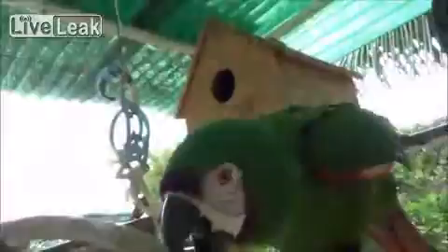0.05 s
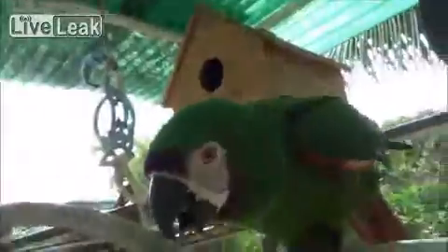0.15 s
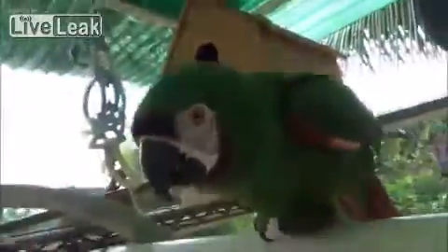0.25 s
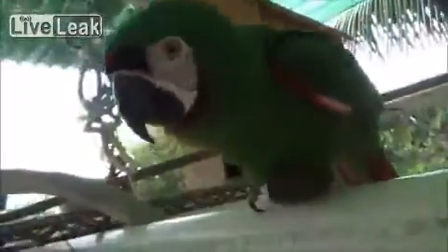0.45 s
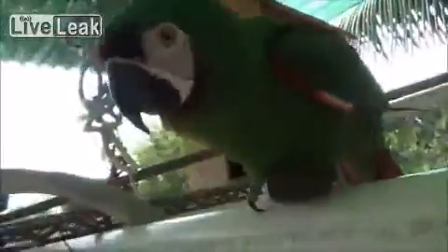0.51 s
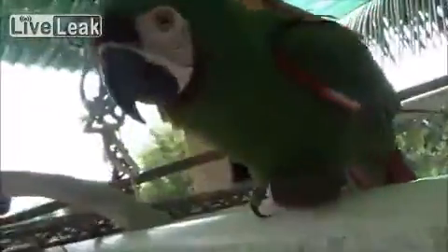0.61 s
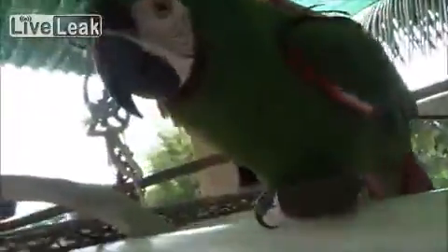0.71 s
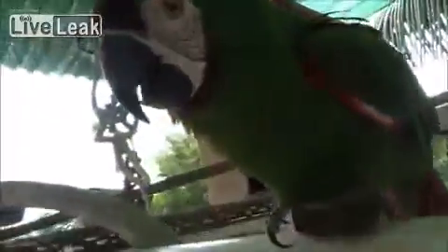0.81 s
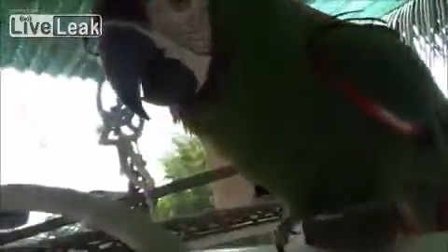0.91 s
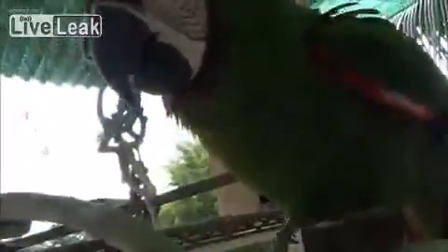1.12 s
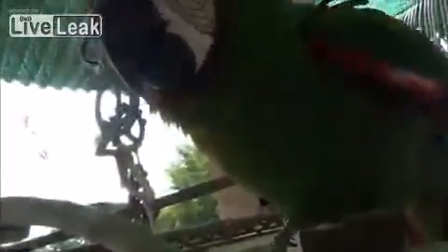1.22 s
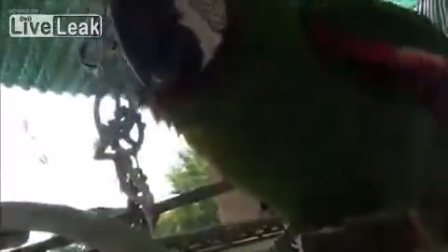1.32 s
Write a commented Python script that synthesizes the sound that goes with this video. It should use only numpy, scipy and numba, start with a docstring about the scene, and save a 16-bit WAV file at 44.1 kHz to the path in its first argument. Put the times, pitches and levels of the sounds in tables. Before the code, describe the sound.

A large parrot gives one harsh, raspy call close by, trailing into dry clicks.

```python
"""A macaw calls once, close by, under a light porch roof.
Quiet outdoor hiss, rumble and a thin whine run throughout. The bird shifts with a soft rustle.
Its voice box snaps unevenly in a harsh rasp with a squeak, then locks into a wavering nasal note.
The note breaks into a creak, which slows to dry clicks as the beak opens, with one more squeak.
A short echo follows each sound of the call. Last comes a faint, distant whistle."""
import sys
import numpy as np
from scipy import signal
from scipy.fft import rfft, irfft
from scipy.io import wavfile
from numba import njit

SR = 44100
rng = np.random.default_rng(int(sys.argv[2]) if len(sys.argv) > 2 else 0)


def to_wav(sig):
    """Store sig (one row per channel, or 1-D mono) as 16-bit WAV at the path in sys.argv[1].

    Samples outside -1..1 are clipped; the rate is SR.
    """
    pcm = np.clip(np.atleast_2d(sig), -1, 1) * 32767
    pcm = np.round(pcm).astype(np.int16)
    wavfile.write(sys.argv[1], SR, pcm.T)  # frames by channels


N = 59535
T = np.arange(N) / SR

# Tone of the outdoor hiss. Each row: frequency in Hz, level in dB.
HISS_COLOUR = [(18, -55), (30, -14), (59, -9), (92, -3), (122, -6), (222, -5.5), (296, -3), (374, -11.5),
               (567, -6.5), (1200, -12.5), (1730, -11), (2030, -13), (15000, -26)]
# Swell of the hiss. Each row: time in seconds, change of level in dB.
HISS_SWELL = [(0, 0), (.2, 0.5), (1.0, 0.5), (1.15, -1), (1.35, -2)]
# Loudness of the rustle. Each row: time in seconds, level in dB.
RUSTLE_LEVEL = [(.05, -67), (.07, -40), (.105, -43), (.15, -58), (.17, -81)]
# Tone of the rustle. Each row: frequency in Hz, level in dB.
RUSTLE_COLOUR = [(150, -37), (300, 11.5), (600, -3.5), (1100, 4), (2500, -2.5), (6000, -10.5), (14000, -15)]
# Course of the rasp. Each row: time in seconds, level in dB, treble boost in dB,
# level of every second snap against the others in dB.
RASP_SHAPE = [(.211, -22, -29, -23.5), (.219, -17, -29, -19), (.238, -19, -13, 4), (.248, -10, 0.5, -2),
              (.262, -14, 0, 5), (.29, -11, -1, -8), (.326, -11.5, 3.5, 6.5), (.352, -12.5, -2.5, 12),
              (.385, -40, 24.5, -4), (.42, -32, 4, 6)]
# Where the throat rings in the rasp. Each row: frequency in Hz, width in Hz, level in dB.
RASP_THROAT = [(474, 270, 0.5), (763, 218, 7.5), (1670, 580, -16), (2910, 460, -6), (3920, 400, -5.5),
               (6430, 520, -13.5), (7900, 330, -17), (9860, 640, -20.5), (12600, 2100, -25.5)]
# The windpipe's dip between resonances and its treble loss. Each row: frequency in Hz, level in dB.
WINDPIPE = [(4500, 1.5), (5200, -11), (6100, -10.5), (6800, 6.5), (10500, 10), (15000, -8)]
# The nasal ring, which rises as the beak opens. Each row: time in seconds, frequency in Hz.
NASAL_RING = [(.25, 1815), (.272, 2100), (.326, 2070), (.35, 2400), (.388, 2650), (.415, 2700),
              (.475, 2370), (.55, 2320), (.66, 2430)]
# Squeaks. Each row: start in seconds, length in seconds, first and last pitch in Hz, level in dB.
SQUEAKS = [(0.221, 0.028, 398.8, 635, -16.5), (0.931, 0.0175, 750, 553, -19)]
# Tune of the note. Each row: time in seconds, pitch in Hz.
NOTE_PITCH = [(.335, 535), (.355, 502.7), (.374, 456.8), (.394, 427), (.414, 384.5), (.432, 337.7),
              (.448, 376.3), (.466, 441.2), (.495, 407.7), (.526, 398.1), (.548, 384.6), (.576, 432.8),
              (.6, 397), (.626, 357.4), (.65, 356.7), (.685, 377.5)]
# Effort in the note. Each row: time in seconds, level in dB, overtone boost in dB, roughness from 0 to 1.
NOTE_EFFORT = [(.337, -17, 4, 0.9), (.358, -10, 4.5, 0.35), (.372, -8.5, 0.5, 0.57),
               (.395, -14.5, 3.5, 0.27), (.416, -15, 2, 0.42), (.425, -31, -12, 0.51),
               (.445, -27.5, -21, 0.53), (.466, -12.5, -11.5, 0.63), (.48, -16.5, 5, 0.48),
               (.5, -15.5, -12, 0.7), (.522, -14.5, 3, 0.33), (.545, -16.5, 4, 0.28),
               (.575, -10.5, -1, 0.26), (.605, -14, 5, 0.15), (.645, -16, 2, 0.3), (.678, -15, 2.5, 0.2),
               (.7, -46, 8.5, 0.3)]
# Strength of the note's harmonics. Each row: frequency in Hz, level in dB.
NOTE_COLOUR = [(330, 0), (450, 2), (880, 2), (1080, -10), (1300, -17), (1750, -13), (2200, -10),
               (2720, -13.5), (3150, -29.5), (4400, -25), (5200, -41.5), (6300, -57), (7000, -20),
               (7900, -42), (9600, -31.5), (11000, -49), (15000, -50)]
# Tone of the breath in the note. Each row: frequency in Hz, level in dB.
BREATH_COLOUR = [(60, -15), (200, -14.5), (600, -12.5), (950, 8.5), (1400, 1.5), (2100, 6), (2650, 3),
                 (3200, -4), (4400, -15.5), (5200, -23.5), (6300, -19), (7000, -13.5), (9600, -14.5),
                 (12000, -28)]
# Loudness of the creak. Each row: time in seconds, level in dB.
CREAK_LEVEL = [(.681, -16), (.689, -15.5), (.712, -14.5), (.725, -18.5), (.748, -21.5), (.765, -23),
               (.772, -37)]
# Where the throat rings, beak nearly shut, then open. Each row: frequency in Hz, width in Hz, level in dB.
SHUT_THROAT = [(483, 307, 0.5), (748, 240, 3), (1370, 120, -9), (2126, 142, 0), (3580, 380, -17.5),
               (4210, 190, -14.5), (5420, 144, -17.5), (7060, 400, -7), (9330, 550, -14.5),
               (11600, 6600, -29)]
OPEN_THROAT = [(523, 405, -4.5), (824, 157, 4.5), (1430, 300, -12.5), (2266, 136, 3), (3580, 285, -7),
               (4320, 250, -7), (6030, 200, -16), (7180, 520, -17.5), (9590, 180, -8.5), (12000, 2600, -25)]
# Single clicks. Each row: start in seconds, relative level in dB, hardness from 0 to 1.
CLICKS = [(.754, -3.5, 0), (0.7677, -1, 0), (.7760, -2.5, 0.1), (0.7828, -3.5, 0.2), (0.7975, 2, 0),
          (0.8064, 1.5, 0.07), (0.8151, 0, 0.1), (0.8295, -1.5, 0.1), (0.8357, -1.5, 0.5), (.8424, -1.5, 0),
          (0.8491, -1, 0), (0.8564, 1.5, 0.17), (0.8643, 2, 0.13), (0.873, 0.5, .3), (0.8878, 0, 0),
          (0.8962, -1.5, 0.2), (0.9232, -2.5, 0.9), (.9340, -7.5, 0.1), (.9405, -22, 0.6),
          (.9450, -8.5, 0.1), (.981, -27, 1)]
# Balance of the background, then of the bird. Each row: frequency in Hz, left over right in dB.
BACKGROUND_BALANCE = [(40, 2.5), (140, 8), (300, 4.5), (600, 2.5), (3000, 0.5), (12000, -1)]
BIRD_BALANCE = [(40, -20), (140, 8), (300, 7), (600, 2), (1500, 2.6), (3000, 0), (12000, 2.1)]

TOP_HZ = 16100  # upper limit of the harmonics and of the finished sound


def undb(db):
    """Turn decibels into a number to multiply by."""
    return 10 ** (np.asarray(db) / 20)


def unit(x):
    """Scale a sound to an average strength (rms) of 1."""
    return x / np.sqrt(np.mean(x ** 2))


def curve(table, column=1):
    """Join one column's points with straight lines over time."""
    rows = np.array(table)
    return np.interp(T, rows[:, 0], rows[:, column])


def envelope(table):
    """Loudness over time, silent before the first row and after the last."""
    return undb(curve(table)) * (T > table[0][0]) * (T < table[-1][0])


def colour_at(colour, hz):
    """Look up how strong a tone table is at these frequencies."""
    rows = np.array(colour)
    return undb(np.interp(np.log(np.maximum(hz, 1)), np.log(rows[:, 0]), rows[:, 1]))


def tint(x, colour):
    """Turn each frequency up or down as a tone table says."""
    hz = np.arange(N + 1) * SR / (2 * N)
    return irfft(rfft(x, 2 * N) * colour_at(colour, hz))[..., :N]


def keep_band(x, hz, kind, order=2):
    """Keep the "low" or the "high" side of a frequency."""
    return signal.sosfilt(signal.butter(order, hz, kind, fs=SR, output="sos"), x)


def wander(rate_hz):
    """A smooth random wobble, about 1 in size."""
    return unit(keep_band(rng.standard_normal(N), rate_hz, "low"))


@njit
def resonate(x, hz, width_hz):
    """Let a sound ring around a frequency that can move."""
    out, band, low = np.empty(len(x)), 0., 0.
    for i in range(len(x)):
        step, damping = np.tan(np.pi * hz[i] / SR), width_hz / hz[i]
        ring = (band + step * (x[i] + 1e-18 - low)) / (1 + step * (step + damping))
        band, low = 2 * ring - band, low + 2 * step * ring
        out[i] = damping * ring
    return out


def outdoor_air():
    """A soft hiss, nearly the same in both ears, over a low rumble."""
    middle, side = (unit(tint(rng.standard_normal(N), HISS_COLOUR)) for _ in range(2))
    hiss = undb(-45 + curve(HISS_SWELL)) * (middle + undb(-17) * side * np.array([[1], [-1]]))
    rumble = undb(-62.5) * unit(keep_band(rng.standard_normal((2, N)), 139, "low"))
    return hiss + rumble


def whine(hz=15735):
    """A thin, steady electronic tone."""
    return undb(-58.5) * np.sqrt(2) * np.sin(2 * np.pi * hz * T)


def rustle():
    """A soft brush of noise as the bird shifts."""
    return unit(tint(rng.standard_normal(N), RUSTLE_COLOUR)) * envelope(RUSTLE_LEVEL)


def snaps(times, sizes, puff_s, lead_s=0.001093):
    """The voice box opens softly and shuts hard, with a puff of air around each snap."""
    closing, opening = np.zeros(N), np.zeros(N)
    np.add.at(closing, np.clip((times * SR).astype(int), 0, N - 1), sizes)
    np.add.at(opening, np.clip(((times - lead_s) * SR).astype(int), 0, N - 1), sizes)
    snap = keep_band(closing + undb(-23) * opening, 6900, "low", order=1)
    fade = np.exp(-2 / (puff_s * SR))
    puff_shape = np.sqrt(np.abs(signal.filtfilt([1 - fade], [1, -fade], closing ** 2 + 1e-18)))
    puff = keep_band(puff_shape * rng.standard_normal(N), 3660, "high", order=1)
    return snap + undb(-4) * puff


def flutter(hz, jitter, second_db, scatter_db, count=800):
    """A run of unevenly timed snaps, strong and weak in turn."""
    chance = rng.standard_normal((count, 2))
    times = np.cumsum(np.exp(jitter * chance[:, 0])) / hz
    step_db = np.interp(times, T, second_db * np.ones(N))
    sizes = undb(step_db * (np.arange(count) % 2) + scatter_db * chance[:, 1])
    sizes /= np.hypot(1, undb(step_db))  # taking turns leaves a pair's energy the same
    return snaps(times, sizes * (times < T[-1]), puff_s=0.0013)


def throat(x, rings):
    """Throat and beak ring at several frequencies, which waver slightly together."""
    tuning = 1 + .025 * wander(21)
    out = sum((-1) ** k * undb(db) * resonate(x, hz * tuning, float(width_hz))
              for k, (hz, width_hz, db) in enumerate(rings))
    return keep_band(out, 145, "high")


def rasp():
    """Uneven snaps ring harshly in the throat while the nasal ring rises."""
    buzz = flutter(hz=311.1, jitter=.14, second_db=curve(RASP_SHAPE, 3), scatter_db=0)
    nasal = undb(6) * resonate(buzz, curve(NASAL_RING), width_hz=212.)
    voice = tint(throat(buzz, RASP_THROAT) + nasal, WINDPIPE)
    body = tint(voice, [(2000, -0.5), (4500, -15.0)])
    treble = undb(curve(RASP_SHAPE, 2)) * (voice - body)
    return unit(body + treble) * envelope(RASP_SHAPE)


def squeaks():
    """Short, nearly pure glides as the voice starts and stops."""
    out = np.zeros(N)
    for start, length, first_hz, last_hz, db in SQUEAKS:
        along = np.clip((T - start) / length, 0, 1)
        hz = first_hz + (last_hz - first_hz) * along
        out += undb(db) * np.sin(np.pi * along) * np.sin(2 * np.pi * np.cumsum(hz) / SR)
    return out


def nasal_note(jitter=0.04683, shimmer_db=3.5):
    """A stack of harmonics (multiples of the pitch); roughness makes it shaky and breathy."""
    bright_db, rough = curve(NOTE_EFFORT, 2), curve(NOTE_EFFORT, 3)
    hz = curve(NOTE_PITCH) * (1 + jitter * rough * wander(211))
    phase = 2 * np.pi * np.cumsum(hz) / SR
    stack = np.zeros(N)
    for k in range(1, 41):
        upper = np.clip((k * hz - 700) / 1200, 0, 1)  # 0 for low harmonics, 1 for high ones
        scatter = .65 * np.sqrt(rough) * min(k / 4, 1) * wander(70)
        strength = colour_at(NOTE_COLOUR, k * hz) * undb(bright_db * upper) * (k * hz < TOP_HZ)
        stack -= strength * np.cos(k * phase - np.pi * upper + scatter)
    stack += undb(2.5) * resonate(stack, curve(NASAL_RING), width_hz=410.)
    puffs = rng.standard_normal(N) * (1 + np.cos(phase))  # one puff of air per cycle
    breath = undb(bright_db - 9) * np.sqrt(rough) * unit(tint(puffs, BREATH_COLOUR))
    shimmer = undb(shimmer_db * rough * wander(160))
    voice = unit(keep_band(stack * shimmer, 248, "high"))
    return keep_band((voice + breath) * envelope(NOTE_EFFORT), 130, "high")


def creak():
    """Very uneven snaps rattle dryly behind a nearly shut beak."""
    rattle = flutter(hz=396.7, jitter=.25, second_db=-11, scatter_db=1)
    return keep_band(unit(throat(rattle, SHUT_THROAT)) * envelope(CREAK_LEVEL), 113, "high")


def clicks(opening_s=0.823, opened_s=0.868, hard_hz=3450):
    """The rattle slows to single snaps while the beak opens; hard ones get an extra high ring."""
    times, db, hardness = np.array(CLICKS).T
    sizes = undb(db + 23)
    plain = snaps(times, sizes, puff_s=0.0015)
    hard = snaps(times, sizes * undb(-3.5) * hardness, puff_s=0.0015)
    ring = resonate(hard, np.full(N, float(hard_hz)), width_hz=400.)
    opened = np.clip((T - opening_s) / (opened_s - opening_s), 0, 1)
    return throat(plain * (1 - opened), SHUT_THROAT) + throat(plain * opened, OPEN_THROAT) + ring


def far_whistle(peak_s=1.01, spread_s=0.079):
    """A faint, wavering tone swells and fades in the distance."""
    hz = 1500 * (1 + 0.044 * wander(58))
    swell = np.exp(-((T - peak_s) / spread_s) ** 2)
    return undb(-46) * swell * np.sin(2 * np.pi * np.cumsum(hz) / SR)


def echo(x, fade_s, top_hz, channels=2):
    """A crowd of reflections that dies away by 60 dB in fade_s seconds."""
    tail = keep_band(rng.standard_normal((channels, N)), top_hz, "low", order=1)
    tail *= undb(-60 * T / fade_s) * (T > .002)
    tail /= np.sqrt(np.sum(tail ** 2, axis=1, keepdims=True))
    return signal.fftconvolve(x[None], tail, axes=1)[:, :N]


def place(pair, balance):
    """Share a sound between left and right, frequency by frequency."""
    return np.array([tint(channel, [(hz, sign * db / 2) for hz, db in balance])
                     for channel, sign in zip(pair, (1, -1))])


def scene():
    """The bird a little to the left, with echoes from perch and roof, over a quiet background."""
    bird = rasp() + squeaks() + nasal_note() + creak() + clicks()
    thinned = keep_band(bird, 475, "high", order=1)
    perch = undb(-16) * echo(thinned, fade_s=0.11, top_hz=7500, channels=1)[0]
    roof = undb(-24) * echo(bird, fade_s=0.069, top_hz=4960)
    background = outdoor_air() + whine() + rustle() + far_whistle()
    return place(bird + perch + roof, BIRD_BALANCE) + place(background, BACKGROUND_BALANCE)


def record(dry):
    """Round off the tallest peaks and cut the highest treble."""
    ceiling = .95
    rounded = dry / (1 + (dry / ceiling) ** 6) ** (1 / 6)
    return signal.sosfilt(signal.ellip(10, .2, 80, TOP_HZ, fs=SR, output="sos"), rounded)


dry = scene()
out = record(dry)
to_wav(out)
```